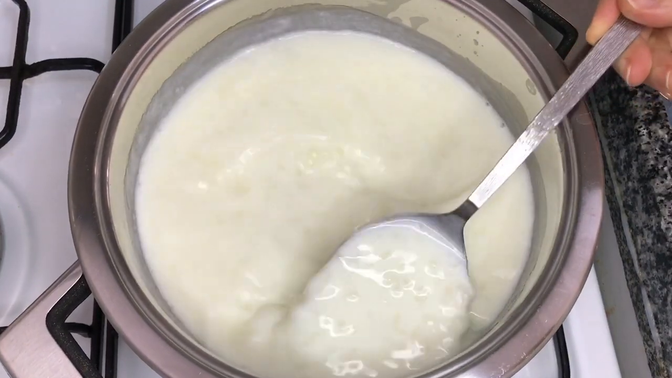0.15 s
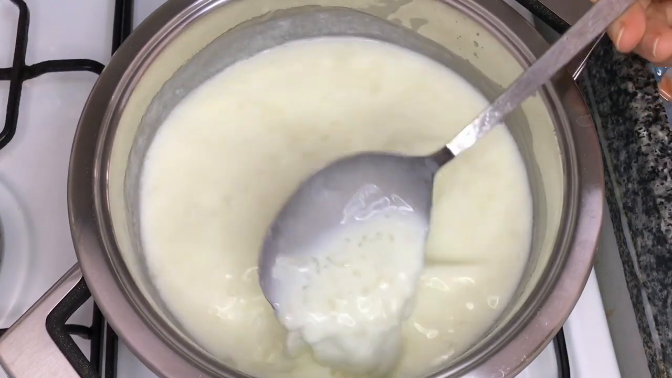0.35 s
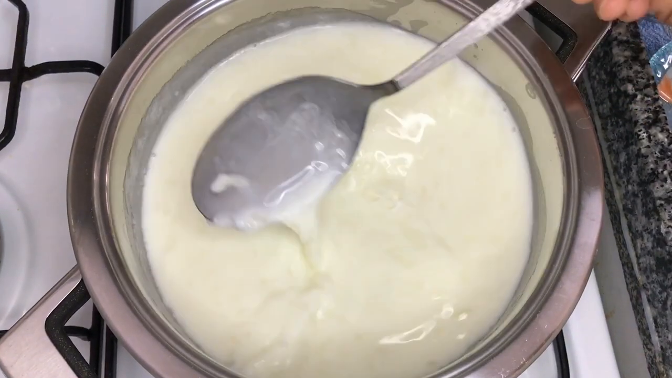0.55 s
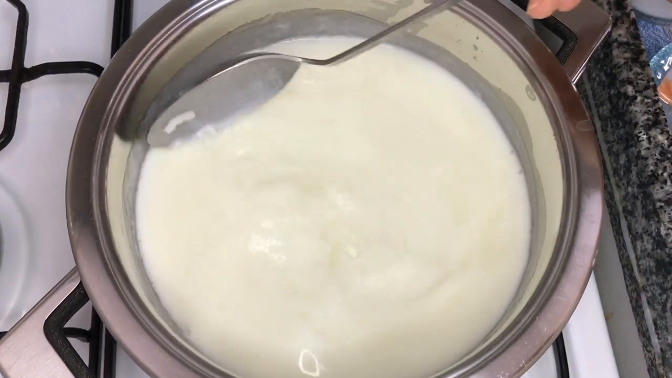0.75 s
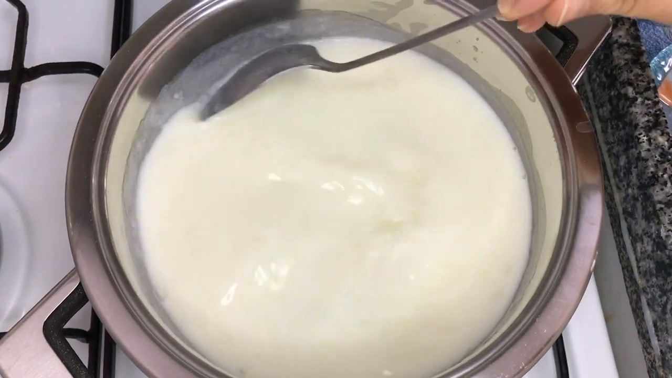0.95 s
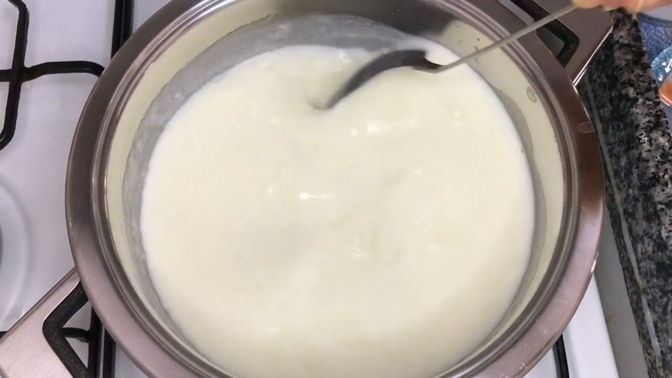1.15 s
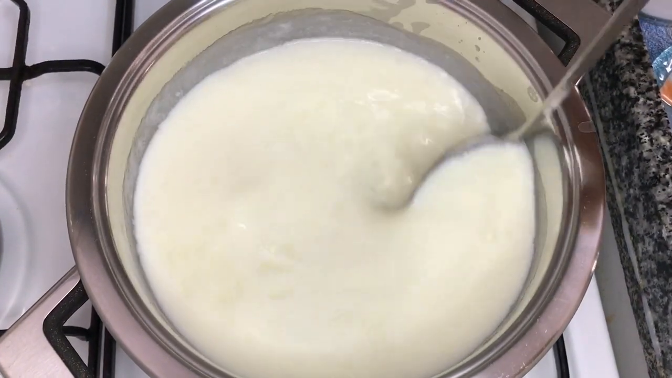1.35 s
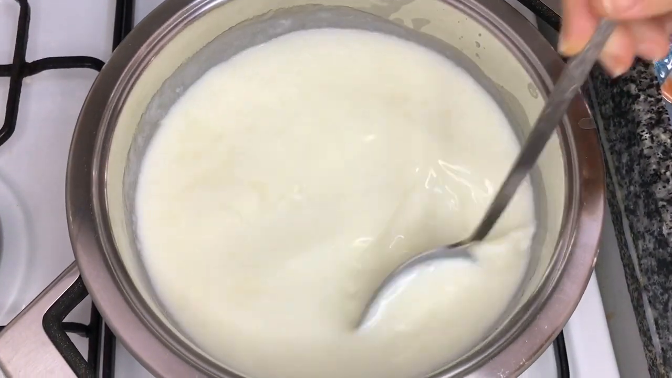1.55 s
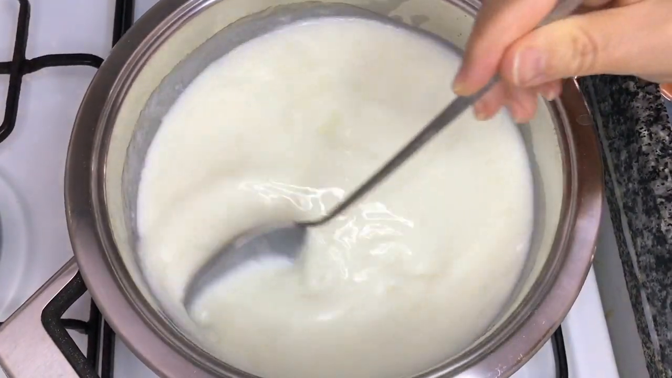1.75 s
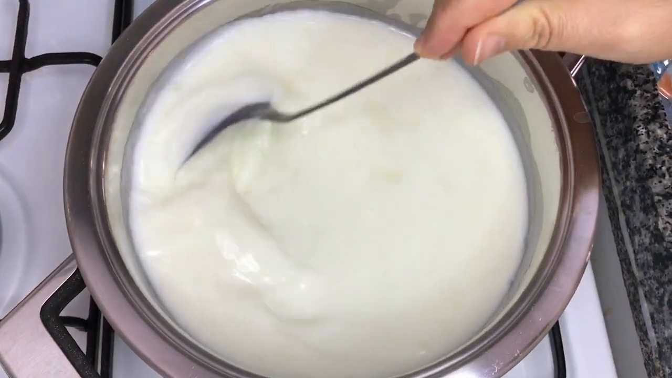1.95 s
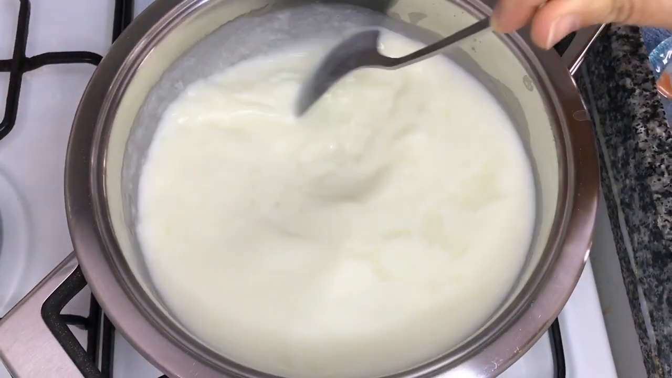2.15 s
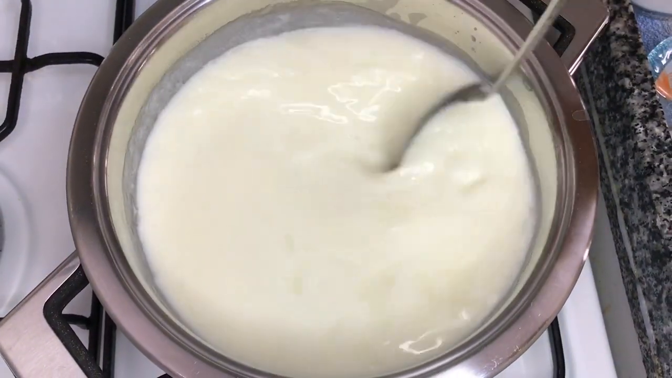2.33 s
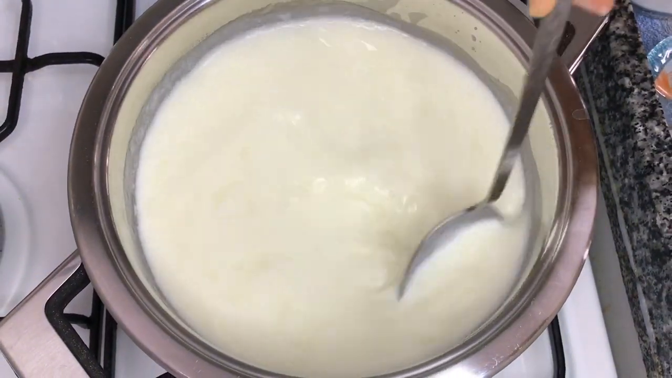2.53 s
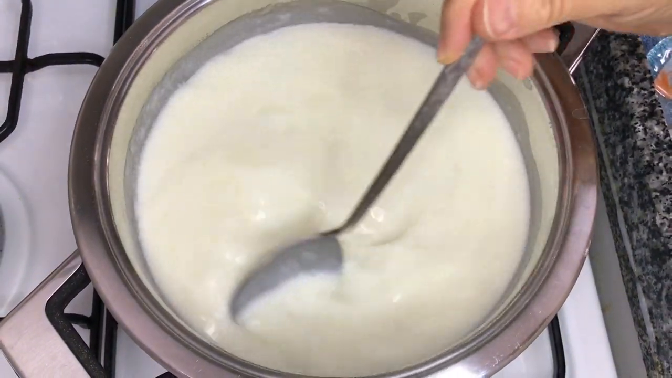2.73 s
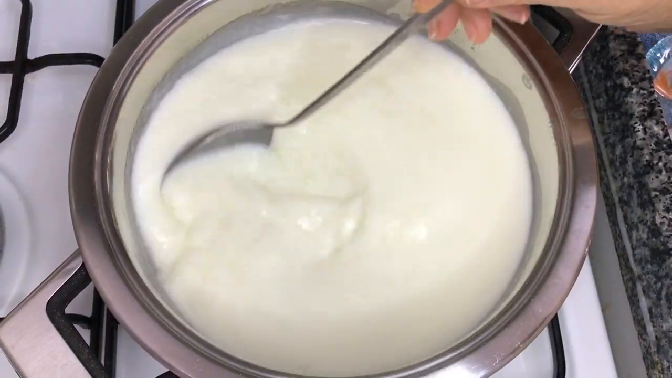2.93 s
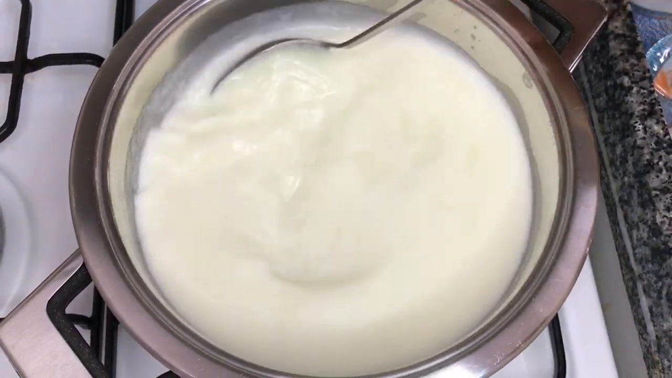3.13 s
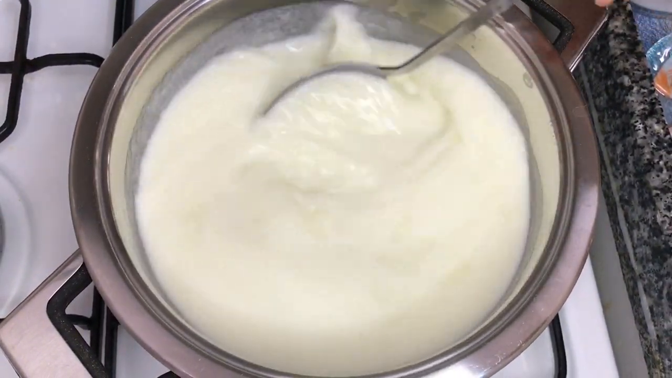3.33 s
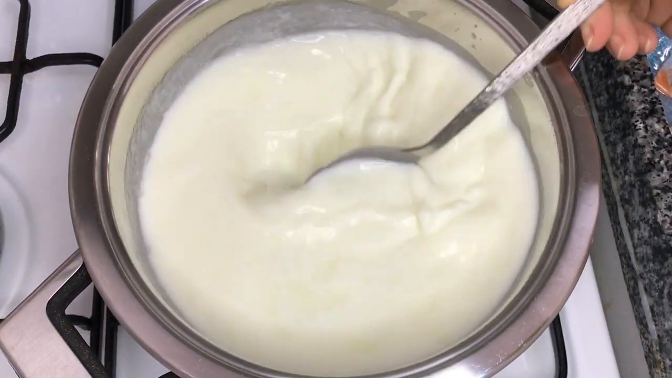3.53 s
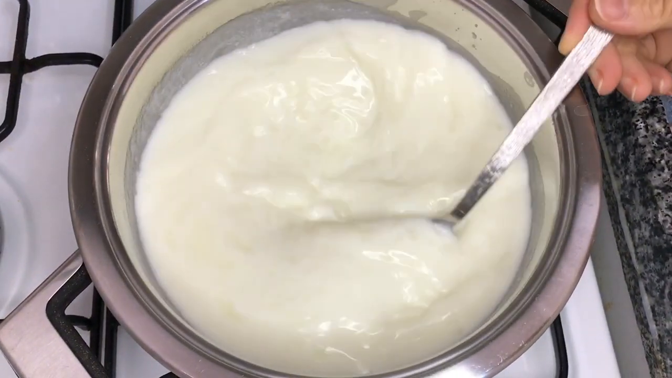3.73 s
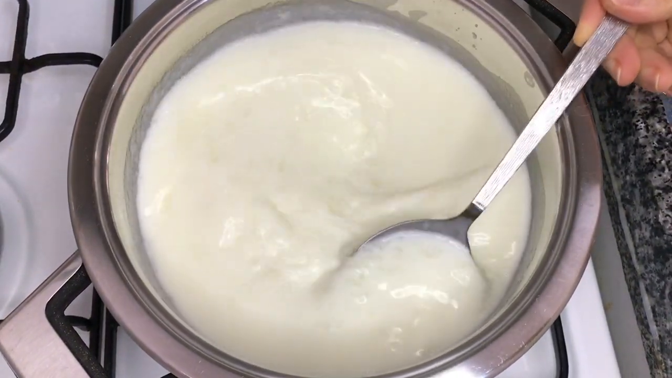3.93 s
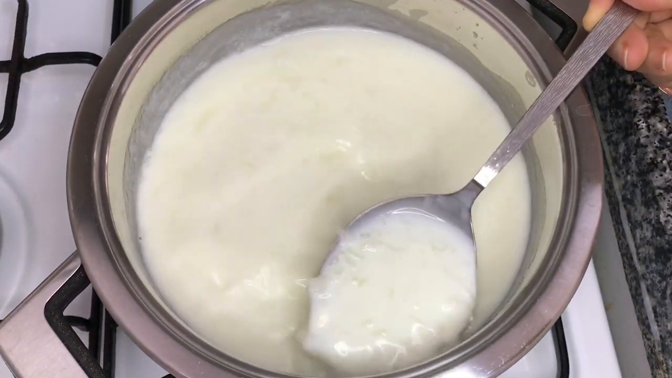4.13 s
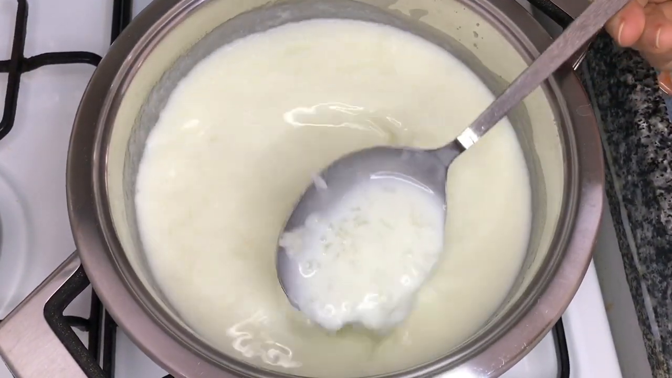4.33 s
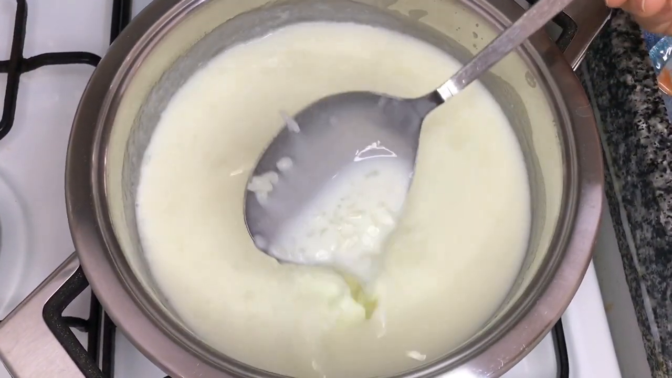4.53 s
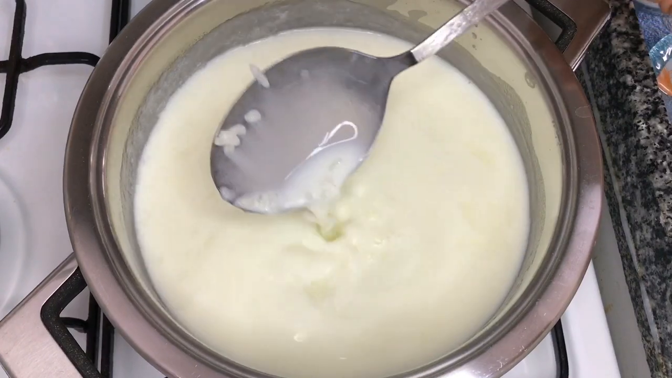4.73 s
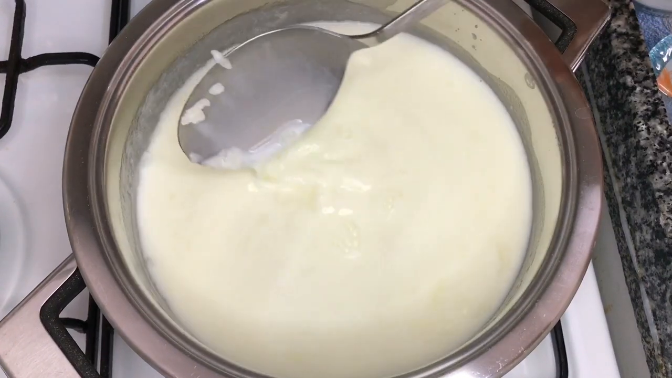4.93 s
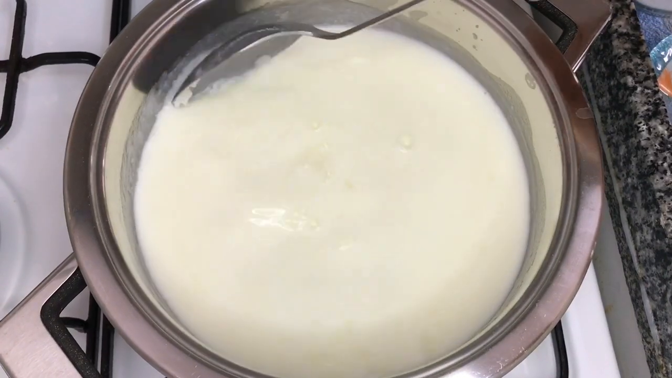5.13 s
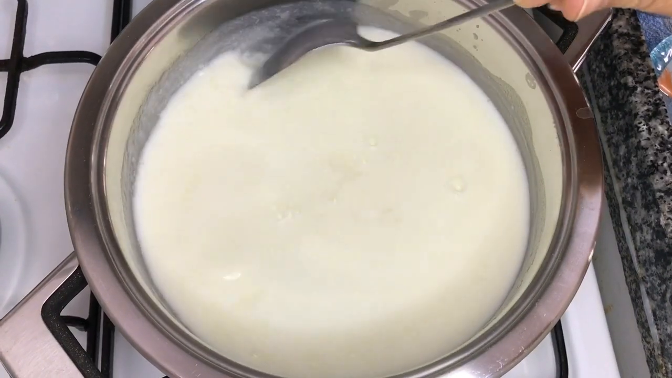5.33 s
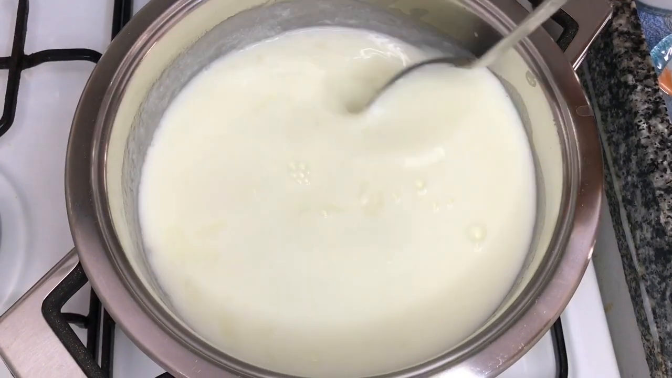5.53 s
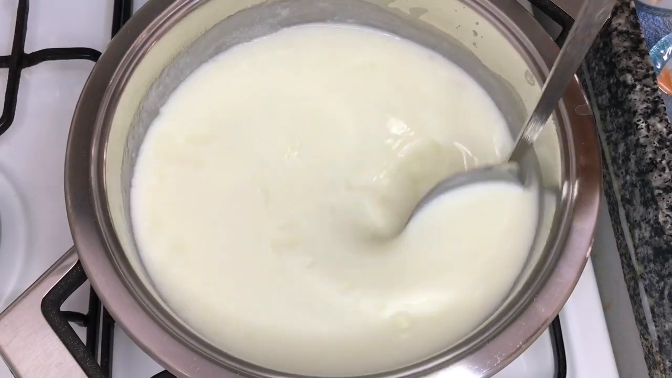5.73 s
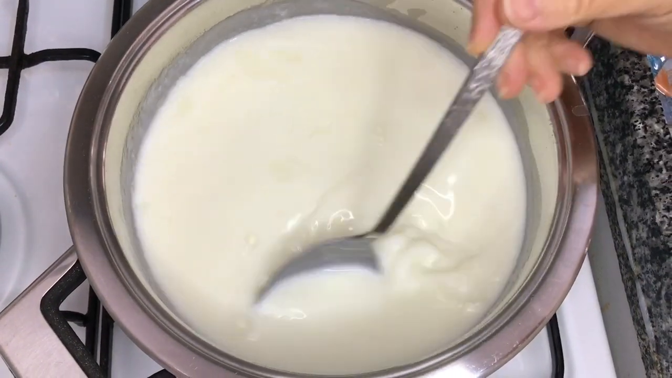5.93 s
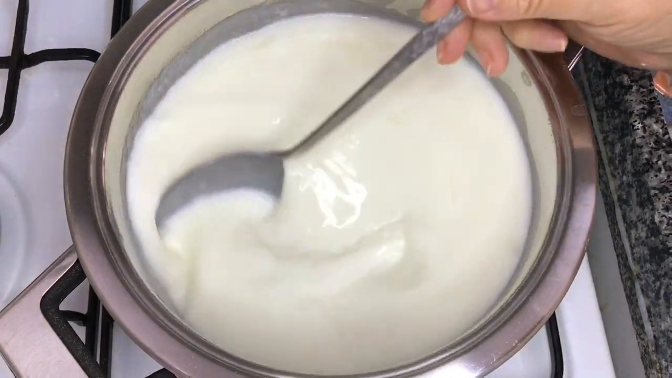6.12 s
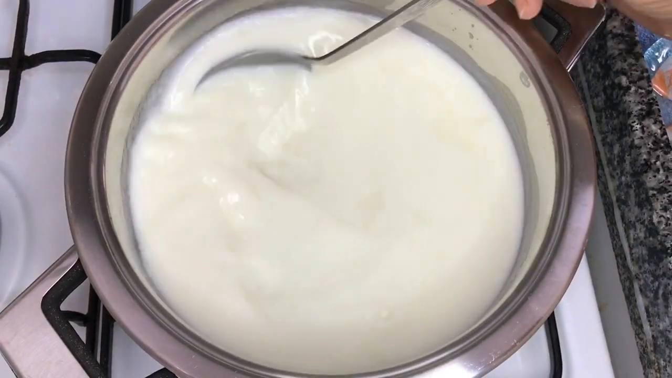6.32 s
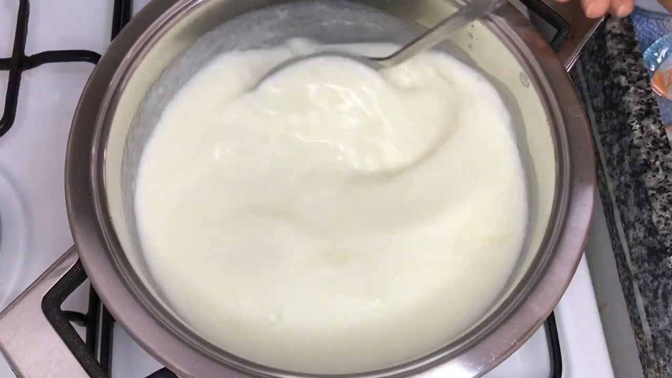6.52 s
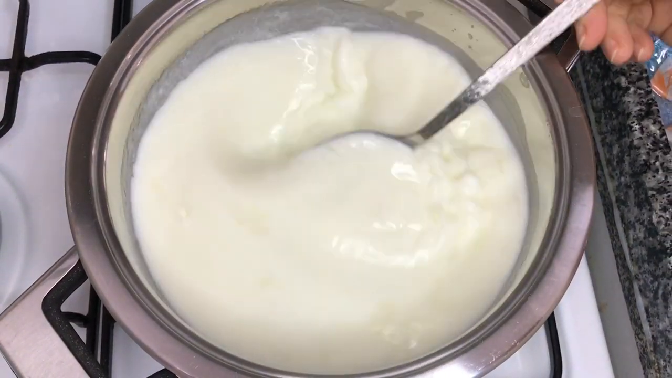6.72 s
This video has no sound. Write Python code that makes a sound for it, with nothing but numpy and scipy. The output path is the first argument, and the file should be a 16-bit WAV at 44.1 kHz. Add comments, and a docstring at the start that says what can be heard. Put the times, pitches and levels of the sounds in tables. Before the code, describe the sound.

A metal spoon sweeps round a heavy filled pot, each stroke a bright, gritty swish about half a second long, with ringing knocks on the steel and soft liquid gurgles. Two pauses leave only plinking drops and steady gas hiss; the sharpest knock comes as stirring resumes after the second. Recorded close, mono, with a short hard-walled kitchen echo.

```python
"""Spoon stirring rice and milk in a steel pot

A steel spoon scrapes the bottom (random slips ringing the pot's modes), knocks on the wall (noise
bursts plus modes) and drags gurgling hollows through the milk (gliding resonances). In two lulls,
spoon lifted, milk drips back (splashes, rising bubble notes). The gas burner hisses (shaped noise)
over a deep throbbing hum (narrow noise)."""
import sys
import numpy as np
from scipy import signal
from scipy.fft import rfft, irfft
from scipy.io import wavfile
from scipy.ndimage import uniform_filter1d, minimum_filter1d

SR = 44100
rng = np.random.default_rng(int(sys.argv[2]) if len(sys.argv) > 2 else 0)


def digitize_waveform(pressure):
    """Quantize a signal to 16-bit integers and store it at the path in sys.argv[1].

    Rows of a 2-D input are taken as channels; values are limited to [-1, 1].
    """
    field = np.atleast_2d(pressure).T
    bounded = np.clip(field, -1, 1)
    quanta = np.round(bounded * 32767).astype(np.int16)
    wavfile.write(sys.argv[1], SR, quanta)


N = 298557
TIME_S, FREQ_HZ = np.arange(N) / SR, np.fft.rfftfreq(N, 1 / SR)

# Levels in the tables are before each source's own gains.
# sweeps over the bottom: start_s, end_s, level_db, easing_by_end_db, body_rel_db, fizz_rel_db,
# firmness_db, froth_db
STROKES = [ (-0.04, 0.122, -51.5, -5.5, 5.5, -6, -8, -70), (1.029, 1.157, -45, 3, -6.5, -2, -2, -70),
           (1.132, 1.58, -37.5, -1.5, -4, -9.5, -4, -61), (1.645, 2.018, -37, -0.5, -3.5, -8.5, -3, -55.5),
           (2.111, 2.624, -28, -17.5, -6.5, -15, -4, -58),
           (2.644, 3.117, -40.5, 6.5, -8.5, -7.5, -0.5, -63), (3.197, 3.636, -32, -9, -6, -6.5, 5.5, -56),
           (3.586, 3.885, -41, 1, -21, -7.5, 0.5, -74), (3.885, 4.098, -37.5, -14, -4.5, -9, 2.5, -72),
           (5.352, 5.532, -40.5, 0, -10.5, -2, -4, -65), (5.488, 5.914, -31.5, -16.5, -3.5, -11.5, -1, -68),
           (5.878, 6.072, -48, -5, -20, 5, 8, -74), (6.004, 6.382, -35, -6, -7.5, -6.5, 3.5, -66),
           (6.425, 6.847, -35, -8.5, -6, -8, 0.5, -60)]
# glides of the sunken spoon: start_s, end_s
GLIDES = [(1.1, 4.1), (5.4, 6.9)]
# hand bearing down: middle_s, half_length_s, extra_pressure_db
PRESSES = [(1.29, 0.1, 2.5), (1.875, 0.0099, 4), (1.972, 0.0095, 17), (2.32, 0.015, 3.5),
           (3.005, 0.026, 4.5), (3.46, 0.017, 5), (3.875, 0.036, 4), (5.862, 0.027, 11.5)]
# steel rubbing on steel under milk: freq_hz, density_db (per Hz, relative)
RUB_SPECTRUM = [(150, -9.5), (330, -19.5), (520, -13), (800, -7), (1050, -6.5), (1300, -0.5), (2000, -2.5),
                (2800, 11.5), (3350, 4), (4400, 7.5), (5800, 4.5), (7200, 3.5), (10000, -5), (16000, -21.5)]
# modes of the filled pot: freq_hz, height_over_broad_response_db, t60_s
POT_MODES = [(712, -9.5, 0.08), (728.8, 21, 0.24), (966, 3.5, 0.074), (1221, 6.5, 0.12), (1342, 6, 0.13),
             (1560, -20, 0.14), (1573, 10.5, 0.11), (1677, 3.5, 0.37), (1680, 4, 0.077), (2078, 13, 0.34),
             (2175, 2, 0.28), (2332, 10.5, 0.16), (2484, -1, 0.1), (2792, 5.5, 0.42), (2940, -7, 0.1),
             (3034, -2, 0.43), (3556, 7.5, 0.066), (3774, 8, 0.039), (3720, 2, 0.13), (4164, 2.5, 0.049),
             (4482, 10, 0.04), (4880, -5, 0.1), (4970, -1.5, 0.04), (5560, -1, .06), (5860, 0.5, 0.022)]
# blow on the wall: freq_hz, density_db (per Hz, relative)
BLOW_SPECTRUM = [(100, -16.5), (400, -17.5), (600, -11), (950, -8), (1400, -3.5), (2500, 4), (4000, 7),
                 (5500, 5), (7000, -6), (9000, -15), (16000, -37)]
# spoon knocks: start_s, level_db, chatter_s, tilt_db (per octave), clatter_db, ring_db, spot_hz, spot_db
KNOCKS = [(1.1149, -13.5, 0.0065, -4, -10, 0, 718.6, -4.5), (1.6842, -16, 0.017, -5, -12, -2.5, 1566, -6.5),
          (1.967, -29, 0.0055, -5, -16, -3.5, 1282, 4.5), (2.08, -40, 0.0048, -7, -4, -10, 1390, -3),
          (2.103, -31.5, 0.0015, -6, -6, -12, 1414, 5), (2.1242, -26, 0.002, -3.5, 7, -5, 4400, -12),
          (2.127, -16.5, 0.0095, -4.5, -17, -0.5, 2630, -3.5), (2.149, -26, 0.0062, 1, -17, -29, 3500, -10),
          (2.425, -27, 0.0038, -3, -14, -30, 2940, 1.5), (2.6925, -21.5, 0.0077, -7, -5.5, -0.5, 1575, -2),
          (2.8635, -31.5, 0.0016, 6, -12, -3, 3700, -0.5), (3.314, -29, 0.025, -3.5, -10, 6, 2450, -1),
          (5.4764, -10.5, 0.0036, -1, -8.5, 2, 2283, -7.5), (5.645, -26, 0.0028, 0, -6, -5, 4400, -11),
          (6.028, -18.5, 0.014, -2.5, -19, -1.5, 4550, -28), (6.168, -27.5, .006, -0.5, -4, -7, 4430, -11),
          (6.4593, -41, 0.012, 7, -8, 8, 1254, 4), (6.644, -32.5, 0.0038, 13, -17, 1, 4560, -1)]
# drops and bursting bubbles: start_s, level_db, pitch_hz, splash_rel_db
DROPS = [(.158, -37, 4600, -20), (.494, -49.5, 9500, 10), (.5103, -39.5, 2340, 4), (0.533, -47, 6960, 0),
         (0.5723, -32, 3720, -5), (0.605, -31, 4640, -12), (.634, -36, 2430, -4.5),
         (3.5146, -25, 1415, -11), (3.659, -22.5, 2270, -27), (4.186, -38, 2800, -10),
         (4.4665, -32.5, 5020, -6), (4.484, -36, 1650, -8), (4.5197, -28, 4820, -21),
         (4.5337, -26, 4080, -8), (4.555, -38, 1340, 0), (4.6085, -22.5, 963, -6), (4.653, -28.5, 5480, -4),
         (4.6562, -26.5, 4850, -9), (4.7133, -34, 3920, -10), (4.7921, -37, 3940, -1.5),
         (4.841, -35.5, 2500, -3.5), (6.2086, -19, 2600, -21), (6.305, -31, 2500, -20)]
# air hollows behind the spoon: start_s, length_s, first_hz, last_hz, level_db, pole_width_hz
HOLLOWS = [(1.207, 0.038, 1637, 1590, -35, 60), (1.248, 0.095, 1344, 1485, -34.5, 150),
           (1.256, 0.074, 2990, 2810, -36.5, 200), (1.375, 0.12, 1554, 1584, -37, 30),
           (1.736, 0.13, 2640, 2960, -37.5, 150), (1.836, 0.14, 1277, 1418, -38, 100),
           (1.885, 0.058, 3950, 3490, -32.5, 200), (1.919, 0.078, 2097, 1795, -31, 222),
           (1.996, 0.141, 1390, 1480, -38, 80), (2.139, 0.124, 1255, 1367, -39, 100),
           (2.149, 0.18, 2713, 1770, -35, 294), (2.29, 0.18, 1410, 1672, -35, 99),
           (2.974, 0.051, 1290, 938, -35, 175), (3.028, 0.099, 1050, 1383, -46.5, 150),
           (3.2, 0.33, 1170, 1260, -39.5, 104), (3.257, 0.16, 2483, 2355, -35.5, 70),
           (3.532, 0.049, 669, 840, -44, 40), (3.572, 0.036, 798, 1460, -37.5, 35),
           (3.583, 0.025, 1177, 2490, -32.5, 70), (3.628, 0.026, 1027, 1570, -38.5, 99),
           (3.667, 0.088, 3740, 3480, -38, 180), (3.674, 0.16, 5650, 5060, -40.5, 500),
           (5.903, 0.046, 4250, 4310, -34, 130), (6.312, 0.044, 867, 1060, -40, 120),
           (6.325, 0.0295, 2900, 3510, -39.5, 300), (6.696, 0.1, 822, 1863, -38.5, 30)]
# soft pushes of spoon or milk, ringing the pot's deep note: start_s, level_db
PLOPS = [(.0, -44.5), (.625, -49.5), (4.612, -43), (4.84, -59)]
# pot rocking on the grate: start_s, length_s, pitch_hz, level_db
ROCKS = [(1.11, 0.35, 78.8, -50.5), (1.672, 0.27, 75, -47), (2.127, 0.27, 81.4, -48), (2.682, 0.3, 76, -45),
         (5.475, 0.26, 80.3, -50.5), (6.027, 0.17, 92, -49), (6.32, 0.58, 58.9, -50.5)]
# low rustle around the pot: time_s, level_db
RUSTLE_LEVEL = [(0.0, -60), (0.4, -60.5), (0.56, -76), (0.81, -65), (0.96, -62), (1.15, -58), (1.96, -65),
                (2.62, -56), (2.94, -60), (3.24, -70), (3.45, -69), (3.66, -64), (3.83, -60.5), (4.94, -74),
                (5.64, -54), (6.77, -66)]
# quiet kitchen, burner on: freq_hz, density_db (per Hz, relative)
AIR_SPECTRUM = [(15, 27.5), (45, 18.5), (75, 15), (115, 14), (170, -6), (240, -1.5), (330, 0.5),
                (450, -9.5), (1000, -4.5), (2800, -3), (5000, -5.5), (6700, -11.5), (11500, -17),
                (16000, -26)]
# gas whistling through the burner: centre_hz, spread_hz, density_db (per Hz, relative)
BURNER_PEAKS = [(736, 55, -2), (1668, 18, 4.5), (2256, 112, 13.5), (2640, 180, 4), (2940, 260, 3),
                (3244, 80, 8.5), (3820, 46, 0.5), (4410, 59, 10.5), (4685, 175, 9.5), (5256, 320, 4),
                (6040, 120, 1), (7360, 250, -7), (7760, 300, -3), (9230, 470, -3), (9990, 890, -2.5),
                (12200, 720, -10)]
# deep hum: time_s, level_db
HUM_LEVEL = [(0.0, -47), (0.07, -42), (1.13, -49), (1.66, -42.5), (1.81, -53), (2.0, -36.5), (3.32, -51),
             (3.36, -48.5), (4.24, -39.5), (4.3, -59), (4.45, -41), (5.28, -62), (5.51, -38.5), (5.79, -62),
             (5.88, -41), (6.43, -59), (6.77, -48)]

ATTACK_S, RELEASE_S = 0.048, 0.095
FIZZ_EASING_SHARE = 0.26  # share of the easing, in dB, that the fizz follows
GLIDE_DB, GLIDE_BODY_REL_DB, GLIDE_FIZZ_REL_DB = -50.5, 2, -19.5
PRESS_BODY, PRESS_FIZZ, PRESS_FIRMNESS = 0.8, 0.18, 0.95  # dB per dB of extra pressure
BUBBLE_1KHZ_T60_S, BUBBLE_SHORTENING = 0.031, 0.45  # t60 falls with this power of pitch
HISS_DB = -51  # rms within 1-15 kHz
EDGE_HZ = 16000


def scrape(grains_per_s=2200, grain_db=3.0, smooth=0.85, judder_db=0.8, grip_db=3, ring_db=-1,
           body_db=-2, mid_db=-3, fizz_db=-4):
    """Tiny slips of steel and rice excite the pot, which rings more whenever the spoon grips."""
    body, middle, fizz, firmness_db = stirring()
    slips = (rng.random(N) < grains_per_s / SR) * rng.choice([-1, 1], N)
    slips = slips * amp(grain_db * np.minimum(rng.exponential(1, N), 5))
    judder = amp(judder_db * evened(band(rng.standard_normal(N), 8.7, 90)))
    grip = amp(firmness_db + grip_db * evened(band(rng.standard_normal(N), 9.4, 21.7)))
    source = evened(slips) + smooth * rng.standard_normal(N)
    rub = colour(travelling(source) * judder, RUB_SPECTRUM)
    ringing = signal.oaconvolve(rub * amp(ring_db) * grip, pot_ring())[:N]
    rub = (rub + ringing) / np.hypot(1, amp(firmness_db))
    low = evened(band(rub, 190, 1800))
    mid = evened(band(rub, 1800, 5000))
    high = evened(band(rub, 5000, 20000))
    return amp(body_db) * body * low + amp(mid_db) * middle * mid + amp(fizz_db) * fizz * high


def stirring():
    """Body, middle and fizz gains, firmness in dB: each sweep changes as it goes; pressure deepens it."""
    glide = sum(contact(start_s, end_s) for start_s, end_s in GLIDES) * amp(GLIDE_DB)
    body_power = (glide * amp(GLIDE_BODY_REL_DB)) ** 2
    middle_power = glide ** 2
    fizz_power = (glide * amp(GLIDE_FIZZ_REL_DB)) ** 2
    firmness_db = np.zeros(N)
    for start_s, end_s, db, ease_db, body_db, fizz_db, firm_db, _ in STROKES:
        touch = contact(start_s, end_s)
        eased_db = ease_db * progress(start_s, end_s)
        power = (touch * amp(db + eased_db)) ** 2
        middle_power = middle_power + power
        body_power = body_power + power * amp(body_db) ** 2
        fizz_power = fizz_power + (touch * amp(db + fizz_db + FIZZ_EASING_SHARE * eased_db)) ** 2
        firmness_db = firmness_db + touch * firm_db
    press_db = swells(PRESSES)
    body = np.sqrt(body_power) * amp(PRESS_BODY * press_db)
    middle = np.sqrt(middle_power) * amp(press_db)
    fizz = np.sqrt(fizz_power) * amp(PRESS_FIZZ * press_db)
    return body, middle, fizz, firmness_db + PRESS_FIRMNESS * press_db


def contact(start_s, end_s):
    """The spoon bites quickly, holds and lets go more slowly."""
    return np.clip((TIME_S - start_s) / ATTACK_S, 0, 1) * np.clip((end_s - TIME_S) / RELEASE_S, 0, 1)


def progress(start_s, end_s):
    """Runs from 0 to 1 over a sweep."""
    return np.clip((TIME_S - start_s) / (end_s - start_s), 0, 1)


def swells(rows):
    """Bell-shaped rises in dB."""
    return sum(db * np.exp(-((TIME_S - middle_s) / half_s) ** 2) for middle_s, half_s, db in rows)


def travelling(x):
    """The moving spoon crosses nodes of the pot's modes, so narrow bands swell and fade."""
    spectrum = signal.stft(x, nperseg=1024, noverlap=768)[2]
    gain = patches(4.2, 4, 16)[:, :spectrum.shape[1]]
    return signal.istft(spectrum * gain, nperseg=1024, noverlap=768)[1][:N]


def patches(depth_db, width_bins, length_frames):
    """Gain over (frequency, time) that drifts in narrow patches."""
    field = rng.standard_normal((513, N // 256 + 5))
    for _ in range(2):
        field = uniform_filter1d(field, width_bins, axis=0)
        field = uniform_filter1d(field, length_frames, axis=1)
    return amp(depth_db * np.clip(evened(field), -2.2, 2.2))


def pot_ring():
    """What the pot's decaying modes add to one unit click."""
    t = TIME_S[:SR // 2]
    ring = np.zeros(len(t))
    for hz, height_db, t60_s in POT_MODES:
        scale = 2 * np.log(1000) / (t60_s * SR)  # height is relative to the click's flat spectrum
        ring += amp(height_db - 60 * t / t60_s) * scale * np.cos(2 * np.pi * hz * t)
    return ring


def froth(lo_hz=9500, hi_hz=14500, sharpness=5, flicker_db=2):
    """Milk fizzes faintly past the spoon's rim in the fast middle of each sweep."""
    speed = np.zeros(N)
    for start_s, end_s, *_, db in STROKES:
        speed += amp(db) * np.sin(np.pi * progress(start_s, end_s)) ** sharpness
    flicker = amp(flicker_db * evened(band(rng.standard_normal(N), 10, 200)))
    return speed * evened(band(rng.standard_normal(N) * flicker, lo_hz, hi_hz))


def knocks(gain_db=21, clatter_t60_s=0.17, spot_t60_s=0.067):
    """The spoon chatters on the wall: the struck spot sings, clatter dies fast, modes ring on."""
    out, t, ring = np.zeros(N), TIME_S[:SR // 2], pot_ring()
    for start_s, db, chatter_s, tilt_db, clatter_db, ring_db, spot_hz, spot_db in KNOCKS:
        chatter = np.exp(-(t / chatter_s) ** 2)
        clatter = amp(-60 * t / clatter_t60_s)
        envelope = np.hypot(unit_energy(chatter), amp(clatter_db) * unit_energy(clatter))
        burst = envelope * rng.choice([-1, 1], len(t))
        blow = colour(burst + amp(ring_db) * ring, BLOW_SPECTRUM, tilt_db)
        spot = np.sin(2 * np.pi * spot_hz * t) * amp(-60 * t / spot_t60_s) * (1 - chatter)
        add(out, start_s, amp(db + gain_db) * (blow + amp(spot_db) * unit_energy(spot)))
    return out


def gurgles(gain_db=-4):
    """Hollows in the milk resonate, gliding as they open or close."""
    out = np.zeros(N)
    for start_s, length_s, first_hz, last_hz, db, width_hz in HOLLOWS:
        u = np.linspace(0, 1, int(length_s * SR))
        note = narrow(first_hz * (last_hz / first_hz) ** (u ** 1.4), width_hz)
        add(out, start_s, amp(db + gain_db) * evened(note * np.sin(np.pi * u)))
    return out


def drops(rise=0.266, splash_t60_s=0.014, pot_db=-4):
    """Each drop splashes and leaves a bubble whose note rises as it dies; higher notes splash higher."""
    out, t = np.zeros(N), TIME_S[:SR // 6]
    for start_s, db, hz, splash_db in DROPS:
        t60_s = BUBBLE_1KHZ_T60_S * (1000 / hz) ** BUBBLE_SHORTENING
        rising_hz = hz * (1 + rise * np.minimum(t / t60_s, 1))
        bubble = np.sin(2 * np.pi * np.cumsum(rising_hz) / SR)
        bubble = bubble * amp(-60 * t / t60_s) * (1 - np.exp(-t * hz))
        spray = [(hz * 0.75, -20), (hz * 0.77, -10), (hz, 0), (hz * 2, -9), (hz * 6, -18), (hz * 20, -36)]
        splash = colour(rng.standard_normal(len(t)) * amp(-60 * t / splash_t60_s), spray)
        add(out, start_s, amp(db) * (bubble + amp(splash_db) * splash))
    return out + amp(pot_db) * signal.oaconvolve(out, pot_ring())[:N]


def plops(hz=724, t60_s=0.47, rise_s=0.0068):
    """Soft pushes of spoon or milk ring only the deep note of the pot."""
    out, t = np.zeros(N), TIME_S[:SR // 2]
    for start_s, db in PLOPS:
        envelope = amp(db - 60 * t / t60_s) * (1 - np.exp(-t / rise_s))
        add(out, start_s, envelope * np.sin(2 * np.pi * hz * t))
    return out


def rocking(pole_width_hz=7.1):
    """A push sets the heavy pot swaying on the grate with a low hum."""
    out = np.zeros(N)
    for start_s, length_s, hz, db in ROCKS:
        u = np.linspace(0, 1, int(length_s * SR))
        hum = narrow(np.full(len(u), hz), pole_width_hz)
        add(out, start_s, amp(db) * evened(hum * np.sin(np.pi * np.sqrt(u))))
    return out


def rustle(lo_hz=235, hi_hz=390):
    """A soft low wash of band noise comes and goes under the hiss."""
    level = amp(np.interp(TIME_S, *np.transpose(RUSTLE_LEVEL)))
    return level * evened(band(rng.standard_normal(N), lo_hz, hi_hz))


def burner_hiss():
    """Steady gas noise, peaking at the burner's resonances."""
    power = read(AIR_SPECTRUM, FREQ_HZ) ** 2
    for hz, spread_hz, db in BURNER_PEAKS:
        power += amp(db) ** 2 / (1 + ((FREQ_HZ - hz) / (0.56 * spread_hz)) ** 2) ** 2
    hiss = irfft(rfft(rng.standard_normal(N)) * np.sqrt(power), N)
    return amp(HISS_DB) * hiss / np.std(band(hiss, 1000, 15000))


def deep_hum(pitch_hz=27.5, pole_width_hz=3, gain_db=-1):
    """Narrow low noise, evened over short spans, throbs with a level curve."""
    hum = narrow(np.full(N, pitch_hz), pole_width_hz)
    hum = hum / np.sqrt(uniform_filter1d(hum ** 2, size=5000))
    return amp(gain_db + np.interp(TIME_S, *np.transpose(HUM_LEVEL))) * hum


def room(x, t60_s=0.32, gap_s=0.018):
    """Dense reflections, as decaying noise that builds up over the gap."""
    t = TIME_S[:SR // 2]
    tail = rng.standard_normal(len(t)) * amp(-60 * t / t60_s) * (1 - np.exp(-(t / gap_s) ** 2))
    tail = colour(tail, [(200, 2.0), (1000, -9.5), (5000, -10.5), (15000, -10.5)])
    return signal.oaconvolve(x, unit_energy(tail))[:N]


def amp(db):
    """Decibels to gain."""
    return 10 ** (np.asarray(db) / 20)


def evened(x):
    """Scales to an rms of one."""
    return x / np.sqrt(np.mean(x ** 2) + 1e-20)


def unit_energy(x):
    """Scales to a summed square of one."""
    return x / np.linalg.norm(x)


def read(points, hz):
    """Gain of a spectrum given as points on a log-frequency axis."""
    point_hz, db = np.transpose(points)
    return amp(np.interp(np.log(hz + 1), np.log(point_hz), db))


def add(mix, start_s, sound):
    """Mixes a sound in at a time."""
    part = mix[max(round(start_s * SR), 0):][:len(sound)]
    part += sound[:len(part)]


def band(x, lo_hz, hi_hz):
    """Keeps one band, with soft edges."""
    loss = (1 + (lo_hz / (FREQ_HZ + 1)) ** 12) * (1 + (FREQ_HZ / hi_hz) ** 12)
    return irfft(rfft(x) / np.sqrt(loss), N)


def colour(x, points, tilt_db=0, size=2048):
    """Causal unit-energy filter of a given spectrum, tilted per octave towards 5 kHz."""
    hz = abs(np.fft.fftfreq(size, 1 / SR))
    folded_hz = np.clip(np.minimum(hz, 5000 ** 2 / (hz + 1)), 700, None)  # mirrored about 5 kHz
    log_gain = np.log(read(points, hz) * amp(tilt_db * np.log2(folded_hz)))
    taps = np.fft.ifft(np.exp(np.conj(signal.hilbert(log_gain)))).real  # minimum phase
    return signal.oaconvolve(x, unit_energy(taps))[:len(x)]


def narrow(hz, pole_width_hz):
    """A randomly driven resonance follows a pitch curve; its swells are partly flattened."""
    pole = np.exp(-2 * np.pi * pole_width_hz / SR)
    drive = rng.standard_normal((len(hz) + SR // 10, 2)) @ [1, 1j]  # 0.1 s run-in
    swell = signal.lfilter([1], np.poly([pole, pole]), drive)[-len(hz):]
    carrier = np.exp(2j * np.pi * np.cumsum(hz) / SR)
    return evened((swell / np.sqrt(abs(swell)) * carrier).real)


def scene(knock_room_db=-14, scrape_room_db=-12, milk_room_db=-11, wall_db=-6):
    """Spoon, milk and stove in a small kitchen with tiled walls."""
    blows = knocks()
    rub = scrape() + froth()
    milk = drops() + gurgles()
    milk = milk + amp(wall_db) * room(milk, t60_s=0.024, gap_s=0.0036)  # echoes between the pot's walls
    echo = room(amp(knock_room_db) * blows + amp(scrape_room_db) * rub + amp(milk_room_db) * milk)
    background = rustle() + burner_hiss() + deep_hum()
    return (blows + rub + milk + echo + plops() + rocking() + background)[None]


def record(dry):
    """A fast limiter holds peaks under full scale; then the band limit."""
    headroom = np.minimum(1, .95 / (abs(dry) + 1e-9))
    gain = uniform_filter1d(minimum_filter1d(headroom, size=81), size=81)
    lowpass = signal.firwin(401, EDGE_HZ, window=("kaiser", 8), fs=SR)
    return signal.oaconvolve(dry * gain, lowpass[None], "same")


dry = scene()
out = record(dry)
digitize_waveform(out)
```